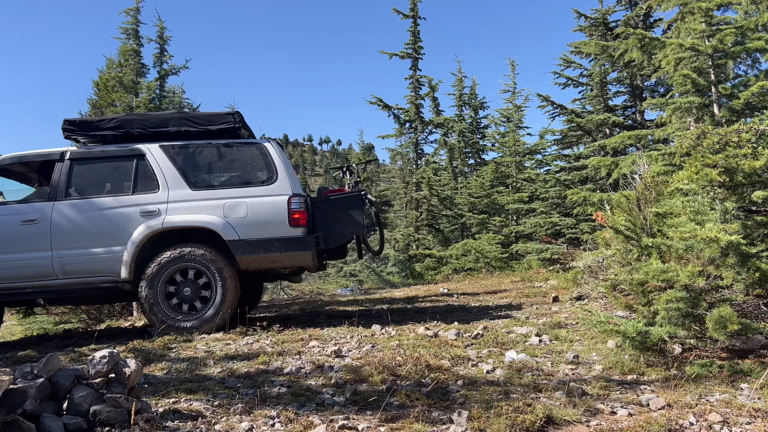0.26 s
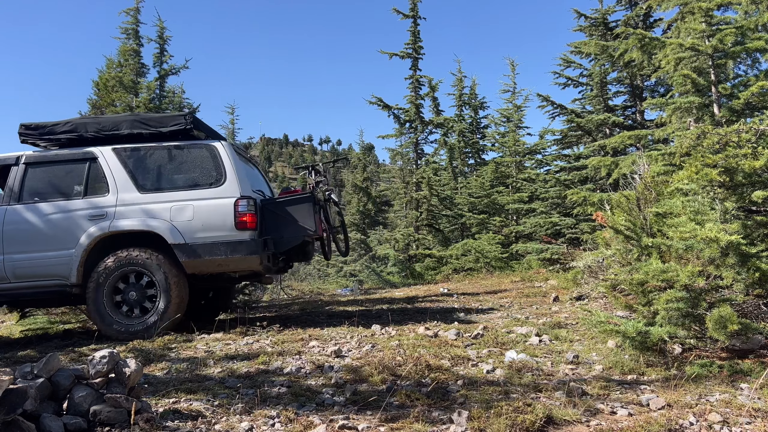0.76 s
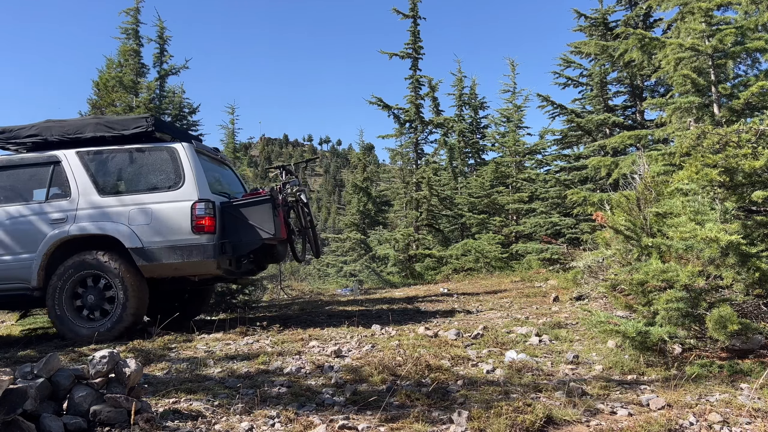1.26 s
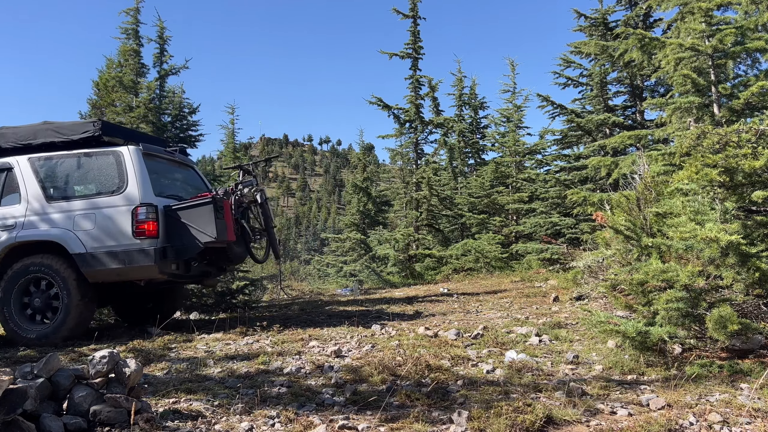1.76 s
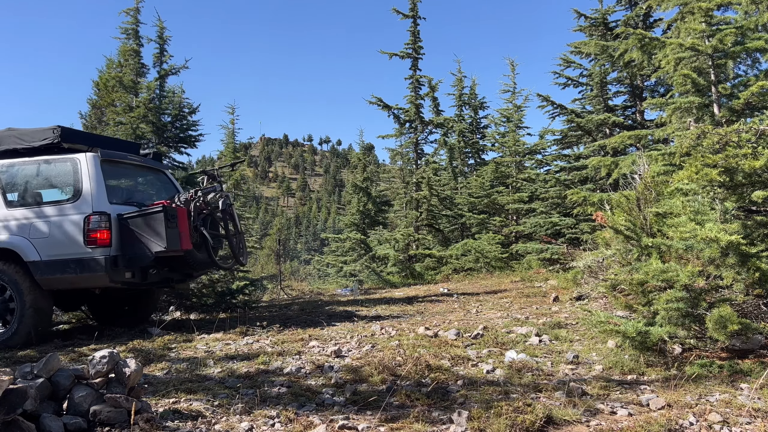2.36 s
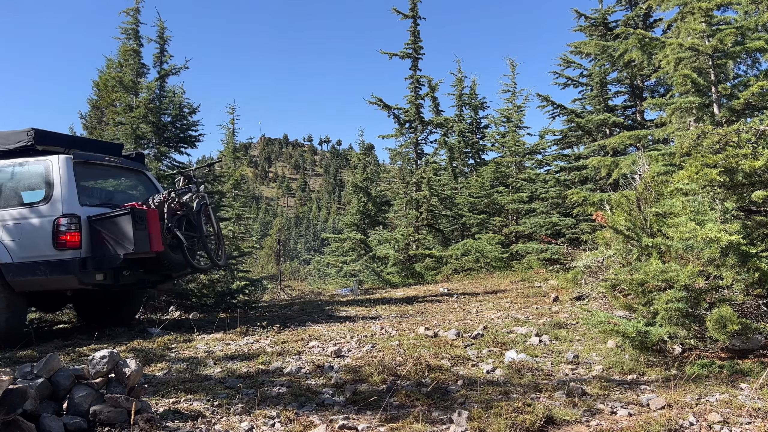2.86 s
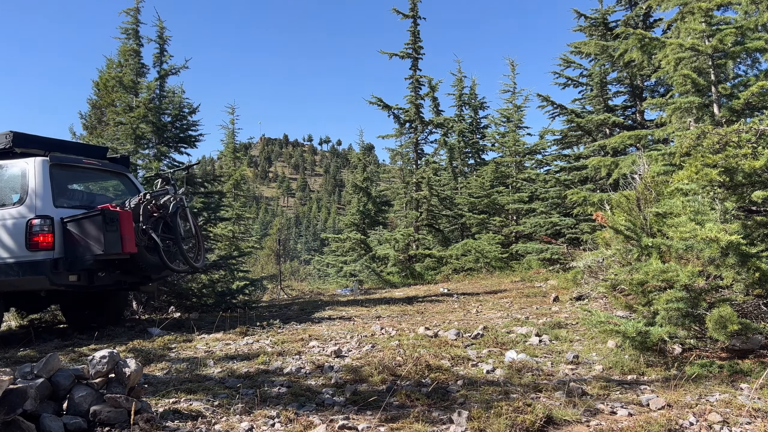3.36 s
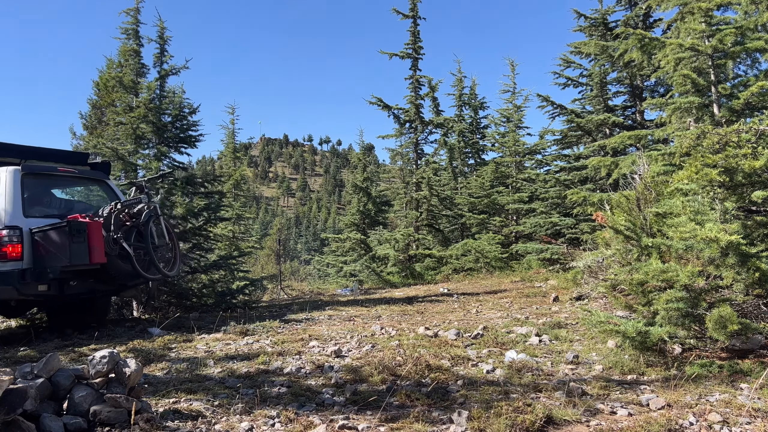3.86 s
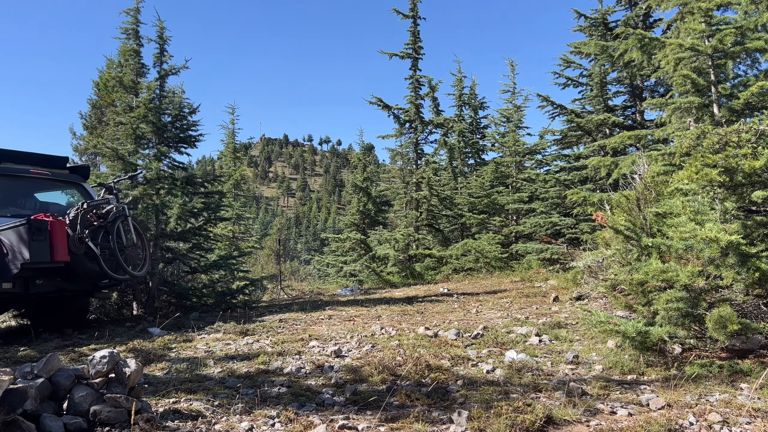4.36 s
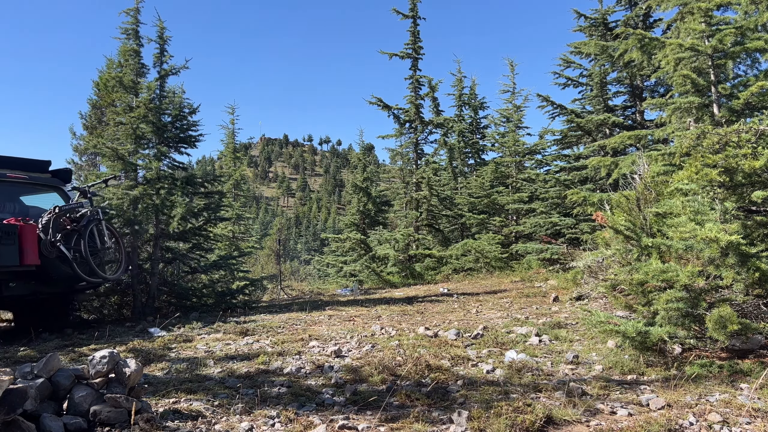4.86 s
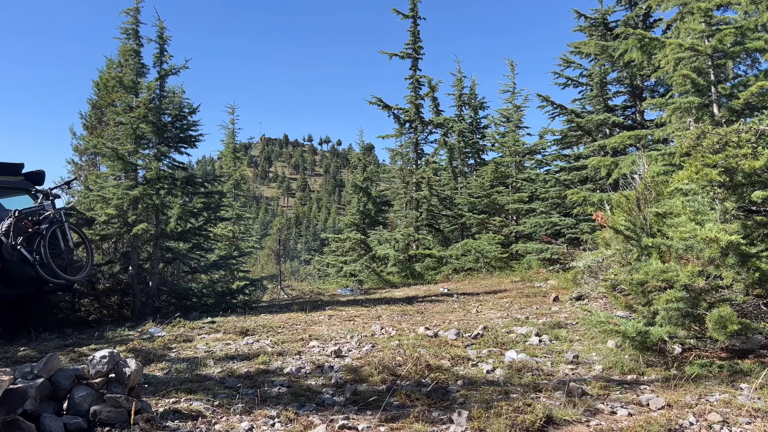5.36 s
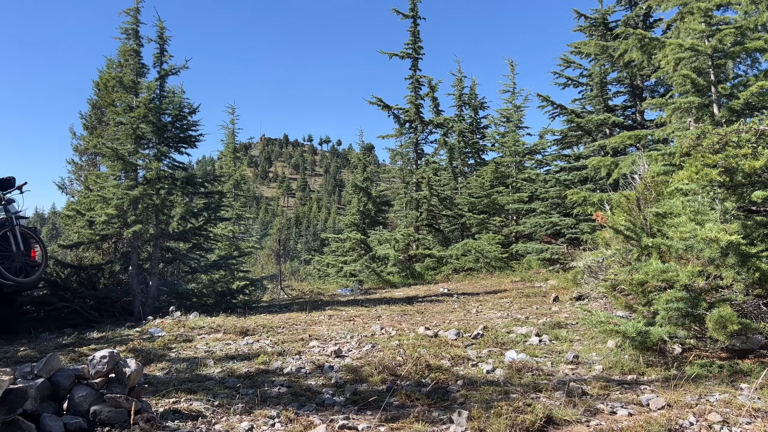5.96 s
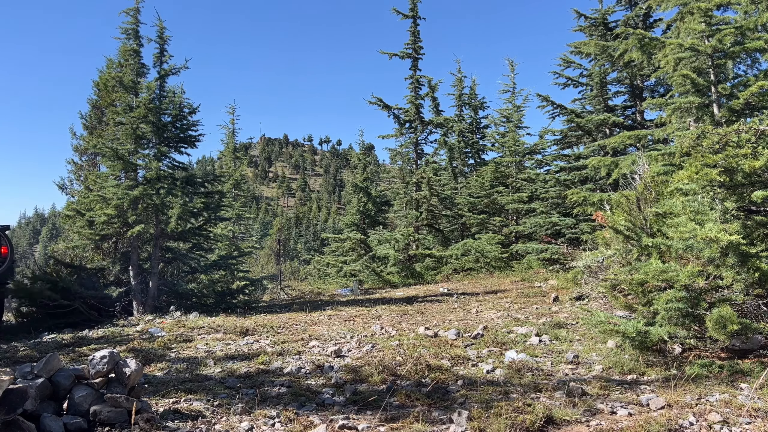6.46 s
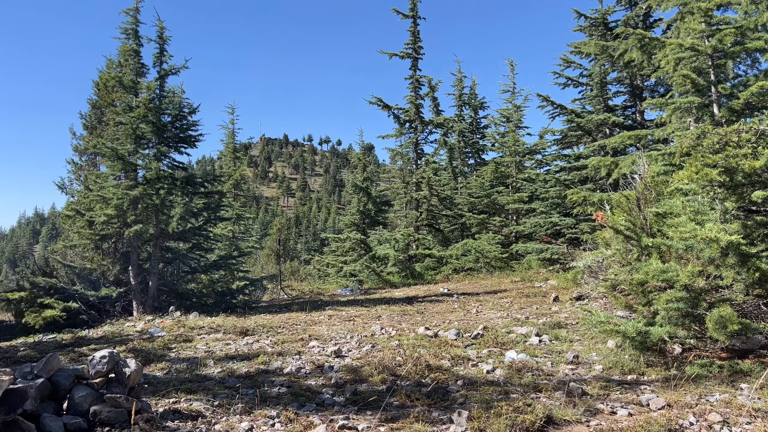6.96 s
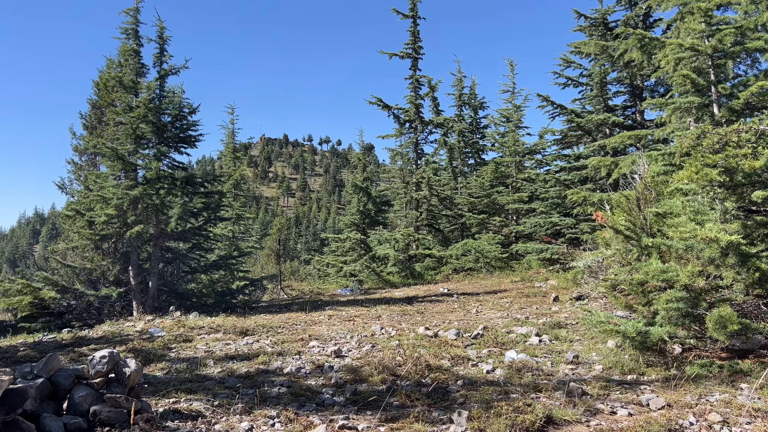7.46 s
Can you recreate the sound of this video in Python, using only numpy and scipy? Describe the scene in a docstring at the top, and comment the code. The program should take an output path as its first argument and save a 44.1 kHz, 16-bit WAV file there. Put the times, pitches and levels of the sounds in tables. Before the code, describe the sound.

Outdoors in a forest clearing, an off-road car creeps away on the left, its low exhaust throbbing steadily just above idle. Tyres grind dully over dirt, with a few stone knocks, the heaviest near the middle. Small birds chirp briskly throughout, nearest on the right, echoing softly among trees. The engine weakens slightly, then drops abruptly at the end. Stationary stereo microphone, wide airy background.

```python
"""From the start an off-road car creeps over a stony forest clearing, its exhaust throbbing just above idle.
Harmonics of the throb make the hum, and shaped noise makes the tyres and the wide forest air.
Small birds chirp throughout, the near ones to the right: swept tones that the trees scatter back.
Stones knock under the tyres as short falling tones, the heaviest almost halfway through.
The hum and tyres weaken as the car draws away, and near the end the exhaust level dips sharply."""
import sys
import numpy as np
from scipy import signal
from scipy.fft import rfft, irfft
from scipy.io import wavfile
from scipy.ndimage import map_coordinates

SR = 44100
rng = np.random.default_rng(int(sys.argv[2]) if len(sys.argv) > 2 else 0)


def unload_wav(signal):
    """Save mono or channel-first audio to the path in sys.argv[1] as 16-bit WAV at rate SR, clipped to [-1, 1]."""
    wavfile.write(
        sys.argv[1],
        SR,
        np.round(np.clip(np.atleast_2d(signal).T, -1, 1) * 32767).astype(np.int16),
    )


N = 339518
TIME = np.arange(N) / SR

# Forest air and distant running noise. Each row: frequency in Hz, relative spectral density in dB.
AIR_SPECTRUM = [(20, -36), (150, 2), (300, -4), (500, -15), (800, -9.5), (1300, -9.5), (1800, -13.5),
                (2400, -18.5), (3500, -18.5), (5000, -21.5), (7000, -26), (10000, -33.5), (15500, -47)]
# Coherence of the air at the two microphones. Each row: frequency in Hz, left-right likeness (0 to 1).
AIR_COHERENCE = [(100, 1), (250, 1), (350, 0.35), (500, 0.18), (800, 0), (1200, 0)]
# level of the air at the start, and its slow fade
AIR_DB, AIR_FADE_DB_PER_S = -46.5, 0.27
# Hisses and snaps in the undergrowth.
# Each row: start in seconds, length in seconds, relative level in dB, centre frequency in Hz.
RUSTLE_EVENTS = [(1.495, 0.014, -46.5, 5950), (4.707, .01, -59, 7000), (6.036, 0.098, -53.5, 7200),
                 (6.124, 0.075, -60, 6960), (7.649, 0.0081, -50, 7870)]
# time for the echoes among the trees to fall by 60 dB
FOREST_T60_S = .85

# Thin whistles from deep in the trees. Each row: start in seconds, length in seconds,
# start pitch in Hz, middle pitch in Hz, end pitch in Hz, relative level in dB.
WHISTLE_EVENTS = [(.0, 0.26, 1755, 1780, 1797, -60), (1.257, 0.69, 2203, 2475, 2384, -62),
                  (1.75, 0.62, 1280, 1187, 1149, -61.5), (2.199, 0.79, 2085, 2012, 2050, -53.5),
                  (4.146, 0.13, 7480, 7560, 7760, -66), (4.554, .5, 1300, 1253, 1204, -61.5),
                  (4.575, .17, 3050, 3334, 3277, -53.5), (7.328, 0.19, 7300, 7450, 7620, -68.5)]
# Faint chirrups of the farther birds. Each row: start in seconds, relative level in dB, top pitch in Hz.
FLOCK_CALLS = [(0, -51, 4100), (.08, -50, 4000), (.64, -50.5, 3750), (0.658, -48.5, 4850),
               (1.18, -55, 3900), (1.243, -51, 4750), (1.63, -55.5, 3800), (2.56, -60, 4770),
               (2.668, -59, 5550), (2.825, -51.5, 4450), (2.9, -50.5, 3900), (2.98, -50.5, 5540),
               (3.315, -50, 4220), (4.05, -52.5, 3800), (4.06, -53, 5500), (4.115, -53, 4800),
               (4.245, -51, 3700), (4.319, -49, 4100), (4.48, -55, 3700), (5.12, -51, 4100),
               (5.58, -53.5, 4150), (6.218, -51.5, 4670), (6.67, -48.5, 3450), (6.745, -51, 3430),
               (6.775, -50, 4700), (6.87, -49, 4080), (7.58, -56, 3500)]
# Contours of the four notes; each call rescales the pitch to its own top and the level by its contrast.
# Each row: time from the start in seconds, relative pitch in Hz, relative level in dB.
ARCH_SHAPE = [(0, 4400, -16), (.005, 5000, -4), (.009, 5600, -1), (.013, 6100, .5), (.018, 5650, -.5),
              (.024, 6000, 0), (.028, 5200, -3), (.033, 4600, -12), (.04, 4500, -22), (.046, 4700, -8),
              (.051, 5000, -5.5), (.056, 4600, -10), (.061, 4500, -24)]
TINK_SHAPE = [(0, 5000, -28), (.008, 5900, -20), (.015, 6250, -11), (.021, 6100, -26), (.025, 5450, -13),
              (.029, 5800, -2), (.035, 6000, 1.5), (.041, 5820, -2), (.047, 5700, -11), (.056, 5650, -22),
              (.072, 5300, -50), (.088, 5100, -20), (.108, 5000, -13), (.12, 4900, -30)]
CHIRRUP_SHAPE = [(0, 3650, -18), (.004, 4000, -5), (.008, 4250, -1.5), (.013, 3830, -7), (.018, 4070, 4),
                 (.022, 3700, -8), (.027, 3300, -11), (.031, 3000, -18), (.036, 3120, -10),
                 (.042, 2750, -16), (.048, 2450, -25)]
CHUP_SHAPE = [(0, 3500, -16), (.005, 3900, -6), (.009, 4400, -6), (.014, 3500, -3), (.02, 3750, 2),
              (.025, 3350, 1), (.03, 2950, -4), (.037, 3020, -6), (.044, 2550, -10), (.055, 2350, -15)]
# High arched calls. Each row: start in seconds, relative level in dB.
ARCH_CALLS = [(0.172, -40), (0.856, -47), (0.972, -51.5), (2.162, -41), (3.526, -42.5), (4.867, -45.5),
              (5.747, -47), (6.882, -44)]
# Falling chirrups. Each row: start in seconds, relative level in dB, top pitch in Hz.
CHIRRUP_CALLS = [(.34, -42, 4305), (.912, -47.5, 4360), (.984, -42.5, 4240), (1.715, -42.5, 4250),
                 (1.929, -46, 5090), (2.508, -41.5, 4150), (3.05, -43.5, 4360), (3.726, -40.5, 4417),
                 (4.386, -40.5, 4305), (5.003, -40.5, 4270), (5.81, -40.5, 4330), (6.421, -43.5, 4220),
                 (6.823, -45.5, 4290), (7.423, -38, 4220)]
# Two-note calls, a low chup and then a high tink.
# Each row: start in seconds, relative chup level in dB, relative tink level in dB.
CHUP_TINK_CALLS = [(.724, -49.5, -44.5), (2.108, -41.5, -40), (3.612, -43, -43.5), (5.198, -40.5, -38),
                   (6.317, -43, -38.5)]
CHUP_HZ, TINK_HZ, TINK_AFTER_S = 4400, 6250, .068
# top pitch of the arched calls, and of the faint second tone above the low chirps
ARCH_HZ, UPPER_HZ = 6070, 5840
# pitch tremors per second in a bird's voice, and decay time constant of the reflections around its perch
RASP_RATE, TWIGS_S = 1100, .005

# Stones under the tyres. Each row: start in seconds, relative peak level in dB, settled pitch in Hz.
STONE_KNOCKS = [(.416, -33, 560), (.795, -36, 570), (3.752, -24.5, 318), (4.155, -32, 574),
                (5.891, -40, 635)]
# Tyres on dirt. Each row: frequency in Hz, relative spectral density in dB.
TYRE_SPECTRUM = [(100, -21), (280, -10), (390, 0.5), (500, -2.5), (700, -7.5), (1200, -20.5), (4000, -63)]
# Fade of the tyres as the car draws away. Each row: time in seconds, relative level in dB.
TYRE_LEVEL = [(0, -50), (.5, -52), (2, -53.5), (7.7, -55)]

# Response of the exhaust pipe, one row for each multiple of the throb rate from the 1st up.
# Each row: relative level in dB, lift under load in dB per throb/s of sag.
PIPE_RESPONSE = [(-36.5, -6), (-10.5, -2.5), (-9.5, -6.5), (2.42, 0.9), (-2.5, 3), (-8.5, 1.5), (-19, -1.5),
                 (-16.5, 1), (-16, 5.5), (-23, 2.5), (-23, 4.5), (-42.5, 2), (-32.5, 6.5), (-46.5, 2),
                 (-40, 1), (-52, 1.5)]
# Uneven burning in the exhaust. Each row: frequency in Hz, relative spectral density in dB.
RUMBLE_SPECTRUM = [(20, -42), (32, -43), (60, -14.5), (90, -16.5), (130, -9), (220, -2), (300, -19.5),
                   (500, -33), (900, -60.5)]
# Engine speed, sagging as the car climbs. Each row: time in seconds, throbs per second.
ENGINE_SPEED = [(0, 22.66), (.7, 22.51), (1.3, 21.41), (2.2, 21.52), (2.7, 21.61), (4.6, 21.6),
                (4.95, 21.09), (5.2, 22.58), (5.5, 22.18), (5.9, 22.47), (6.8, 22.21), (7.45, 21.53)]
# Exhaust level, lower as the car moves off. Each row: time in seconds, relative level in dB.
EXHAUST_FADE = [(0, -24), (2.4, -24.5), (3.8, -25), (5.2, -24.5), (6.0, -25.5), (7.45, -27.5)]
# Deep dip of the exhaust; its first value also holds for all the time before.
# Each row: time in seconds, relative level in dB.
EXHAUST_DIP = [(7.47, -4), (7.525, -12), (7.54, -33), (7.6, -39), (7.64, -15), (7.68, -10), (7.7, -24)]
# share of a throb already gone at the start, and random timing wobble of the throbs in radians
START_TURN, SWAY = .178, .014
# throbs per second at middling load; the sag below it measures the load
CRUISE_RATE = 22
# sag at which the note stops brightening (throbs per second)
FULL_LOAD_SAG = 0.44
# reflections around the car favour one band of the hum, which slides down as it drives off
FAVOURED_HZ, FAVOURED_FALL_OCT_PER_S, FAVOURED_WIDTH_OCT, FAVOURED_DB = 287, .14, 0.15, 3.6
# upper edge of the recorder's band
EDGE_HZ = 15750


def gain_of(db):
    """An amplitude ratio is ten to the power of its decibels over twenty."""
    return 10 ** (np.asarray(db) / 20)


def evened(x):
    """Dividing by the root mean square gives a signal unit power."""
    return x / np.sqrt(np.mean(x ** 2) + 1e-20)


def read(points, hz):
    """A spectrum is interpolated along a logarithmic frequency axis."""
    f, value = np.transpose(points)
    return np.interp(np.log(hz + 1), np.log(f + 1), value)


def curves(rows, t):
    """Each column of a table is interpolated linearly at the times t, its end values held."""
    s, *columns = np.transpose(rows)
    return [np.interp(t, s, c) for c in columns]


def add(mix, s, sound):
    """By superposition a sound is summed into the mix from s seconds on."""
    part = mix[max(round(s * SR), 0):][:len(sound)]
    part += sound[:len(part)]


def wander(size, rate):
    """A smooth random fluctuation of about unit size joins rate random values per second."""
    t = np.arange(size) / SR * rate
    return map_coordinates(rng.standard_normal(int(t[-1]) + 3), [t], order=2, mode="nearest")


def noise(spectrum):
    """White noise weighted in the frequency domain becomes coloured noise of unit power."""
    weight = gain_of(read(spectrum, np.fft.rfftfreq(N, 1 / SR)))
    return evened(irfft(rfft(rng.standard_normal(N)) * weight, N))


def delayed(x, count):
    """A longer path retards the sound, here by count samples."""
    return np.r_[np.zeros(count), x[:-count]]


def air(swell_db=1.0, left_db=1.5):
    """Diffuse noise is coherent between spaced microphones only in the bass; its body leans left."""
    hz = np.fft.rfftfreq(N, 1 / SR)
    same = np.clip(read(AIR_COHERENCE, hz), -1, 1)
    left, other = rfft(noise(AIR_SPECTRUM)), rfft(noise(AIR_SPECTRUM))
    right = same * left + np.sqrt(1 - same ** 2) * other
    # left-right level difference in dB, shared equally between the sides
    difference_db = read([(200, left_db / 2), (500, left_db), (2000, 1.0), (10000, -1.0)], hz)
    lean = gain_of(difference_db / 2)
    wash = irfft(np.array([left * lean, right / lean]), N)
    return wash * gain_of(AIR_DB - AIR_FADE_DB_PER_S * TIME + swell_db * wander(N, 14))


def rustles(octaves=0.43):
    """A brief burst of noise, Gaussian in log frequency, is heard as a bright hiss or snap."""
    out = np.zeros(N)
    for s, length, db, hz in RUSTLE_EVENTS:
        size = int(length * SR)
        distance_oct = np.log2((np.fft.rfftfreq(size, 1 / SR) + 1) / hz)
        colour = np.exp(-(distance_oct / octaves) ** 2 / 2)
        burst = evened(irfft(rfft(rng.standard_normal(size)) * colour, size))
        add(out, s, gain_of(db) * burst * np.hanning(size))
    return out


def forest(x, t60, build, clump_db=3.2):
    """Scattering by trunks builds up clumps of echoes that decay exponentially, different at each side."""
    t = np.arange(SR) / SR
    decay = gain_of(-60 * t / t60) * (1 - np.exp(-(t / build) ** 2)) * gain_of(clump_db * wander(SR, 62.4))
    taps = rng.standard_normal((2, SR)) * (rng.random((2, SR)) < .1) * decay
    taps = taps / np.linalg.norm(taps, axis=1, keepdims=True)
    return signal.fftconvolve(x[None], taps, axes=1)[:, :N]


def from_right(x, count, near_db=-14):
    """Sound from the right reaches the left microphone later; ground and near branches reflect it quickly."""
    t = np.arange(600) / SR
    taps = rng.standard_normal((2, len(t))) * (rng.random((2, len(t))) < .05) * np.exp(-t / 0.023)
    taps = taps / np.linalg.norm(taps, axis=1, keepdims=True)
    near = signal.oaconvolve(x[None], taps, axes=1)[:, :N]
    return np.array([delayed(x, count), x]) + gain_of(near_db) * near


def whistles(waver=.016, flutter_db=3.5):
    """A distant whistle is a tone of parabolic pitch and unsteady level that swells and fades."""
    out = np.zeros(N)
    for s, length, from_hz, mid_hz, to_hz, db in WHISTLE_EVENTS:
        size = int(length * SR)
        parabola = np.polyfit([0, .5, 1], [from_hz, mid_hz, to_hz], 2)
        bend = np.polyval(parabola, np.linspace(0, 1, size))
        hz = bend * (1 + waver * wander(size, 260))
        level = gain_of(db + flutter_db * wander(size, 55)) * signal.windows.tukey(size, .55)
        add(out, s, level * np.sin(2 * np.pi * np.cumsum(hz) / SR))
    return out


def notes(shape, rows, waver, contrast, ragged_db, scatter):
    """Frequency modulation makes a call raspy, and reflections from twigs around the perch blur it."""
    out, t = np.zeros(N), np.arange(0, shape[-1][0], 1 / SR)
    hz, db = curves(shape, t)
    for s, level_db, top_hz in rows:
        pitch_hz = top_hz * hz / hz.max() * (1 + waver * wander(len(t), RASP_RATE))
        turns = np.cumsum(pitch_hz) / SR
        # contrast scales the accents of the note shape
        level = gain_of(level_db + contrast * db + ragged_db * wander(len(t), 389))
        note = level * np.sin(2 * np.pi * turns) * signal.windows.tukey(len(t), .12)
        twigs = rng.standard_normal(len(t)) * (rng.random(len(t)) < .1) * np.exp(-t / TWIGS_S)
        add(out, s, note)
        add(out, s, scatter * signal.fftconvolve(note, twigs / np.linalg.norm(twigs)))
    return out / np.hypot(1, scatter)


def birds(high_waver, low_waver, contrast, ragged_db, scatter, upper_db=-17):
    """Three voices differ in modulation: high arches, cleaner tinks, rougher low chirps with an upper tone."""
    arch_rows = [(s, db, ARCH_HZ) for s, db in ARCH_CALLS]
    chup_rows = [(s, db, CHUP_HZ) for s, db, _ in CHUP_TINK_CALLS]
    tink_rows = [(s + TINK_AFTER_S, db, TINK_HZ) for s, _, db in CHUP_TINK_CALLS]
    upper_rows = [(s, db + upper_db, UPPER_HZ) for s, db, _ in CHIRRUP_CALLS + chup_rows]
    low_parts = [(CHIRRUP_SHAPE, CHIRRUP_CALLS), (CHUP_SHAPE, chup_rows), (CHIRRUP_SHAPE, upper_rows)]
    low = sum(notes(shape, rows, low_waver, contrast, ragged_db, scatter) for shape, rows in low_parts)
    arches = notes(ARCH_SHAPE, arch_rows, high_waver, contrast, ragged_db, scatter)
    tinks = notes(TINK_SHAPE, tink_rows, high_waver / 2, contrast, ragged_db / 2, scatter / 2)
    return arches, tinks, low


def knocks(rise=0.0023, sag=0.91, sag_time=0.0013):
    """A shifting stone gives a strongly damped tone of a few cycles that falls in pitch (times in s)."""
    out, t = np.zeros(N), np.arange(2000) / SR
    for s, db, hz in STONE_KNOCKS:
        turns = np.cumsum(hz * (1 + sag * np.exp(-t / sag_time))) / SR
        envelope = (t / rise * np.exp(1 - t / rise)) ** 2
        add(out, s, gain_of(db) * envelope * np.sin(2 * np.pi * turns))
    return out


def tyres(level_db=2.5, lumpy_db=2.0):
    """Tyres grinding over dirt radiate dull, lumpy noise, partly coherent between the microphones."""
    level = gain_of(level_db + curves(TYRE_LEVEL, TIME)[0] + lumpy_db * wander(N, 45))
    shared = noise(TYRE_SPECTRUM)
    sides = np.array([evened(shared + 1.64 * noise(TYRE_SPECTRUM)) for side in range(2)])
    return level * sides * gain_of([[1.4], [-1.4]])


def pipe_lags(pipe_db, orders):
    """A causal resonator has minimum phase, so its lags follow from the Hilbert transform of its log gain."""
    log_gain = np.log(gain_of(np.r_[pipe_db[0], pipe_db, np.full(16, -45.)]))
    lag = signal.hilbert(np.r_[log_gain, log_gain[-2:0:-1]]).imag[1:len(orders) + 1]
    # the silencer chamber holds back the orders near its resonance, at the 3rd, which rounds each throb
    return lag + np.pi + 2 * np.arctan((orders - 3) / .75)


def exhaust(level_db=3.5, flutter=0.049, rumble_db=-24, limp=0.061, stagger=0.0081, puff=0.5):
    """Three unequal cylinders of a bank ring the pipe in turn; load drags the speed and brightens the note."""
    rate = curves(ENGINE_SPEED, TIME)[0]
    sag = np.minimum(CRUISE_RATE - rate, FULL_LOAD_SAG)
    turns = START_TURN + np.cumsum(rate) / SR
    pipe_db, load_db = np.transpose(PIPE_RESPONSE)
    orders = np.arange(len(PIPE_RESPONSE)) + 1
    # strength (limp) and timing (stagger, in throbs) repeat once in every three throbs
    cycle = 2 * np.pi * turns / 3
    turns = turns + stagger * np.sin(cycle) + SWAY / 2 / np.pi * wander(N, 22)
    favoured_hz = FAVOURED_HZ * 2 ** (-FAVOURED_FALL_OCT_PER_S * TIME)
    hum = np.zeros(N)
    for k, db, lift_db, lag in zip(orders, pipe_db, load_db, pipe_lags(pipe_db, orders)):
        distance_oct = np.log2(k * rate / favoured_hz)
        favour_db = FAVOURED_DB * np.exp(-(distance_oct / FAVOURED_WIDTH_OCT) ** 2 / 2)
        hum += gain_of(db + lift_db * sag + favour_db) * np.cos(2 * np.pi * k * turns - lag)
    hum *= gain_of(level_db) * (1 + limp * np.sin(cycle) + flutter * wander(N, 28))
    # each throb pushes out a puff of rough gas
    rumble = gain_of(rumble_db) * noise(RUMBLE_SPECTRUM) * (1 + puff * np.sin(2 * np.pi * turns))
    course_db = curves(EXHAUST_FADE, TIME)[0] + curves(EXHAUST_DIP, TIME)[0]
    return gain_of(course_db) * (hum + rumble)


def scene():
    """Direct sound, scattered echoes and background superpose at two spaced microphones."""
    arches, tinks, low = birds(high_waver=0.022, low_waver=0.033, contrast=0.95, ragged_db=2.0, scatter=.6)
    direct = from_right(gain_of(3.0) * arches, count=110)
    direct += from_right(gain_of(4.5) * tinks + gain_of(3.0) * low, count=94, near_db=-7)

    # echoes come by many paths, so they carry the whole of each sweep more evenly
    arches, tinks, low = birds(high_waver=.04, low_waver=.085, contrast=.65, ragged_db=1.5, scatter=.15)
    flock = notes(CHIRRUP_SHAPE, FLOCK_CALLS, waver=.045, contrast=0.7, ragged_db=3.5, scatter=0.71)
    thin = whistles()
    echoes = forest(gain_of(2.5) * arches + gain_of(-3.0) * tinks, FOREST_T60_S, build=0.02)
    low_and_far = gain_of(0.9) * low + flock + gain_of(-1.0) * thin
    echoes += forest(low_and_far, FOREST_T60_S, build=0.022)
    far = from_right(gain_of(-0.5) * flock, count=60) + gain_of(-2.0) * thin

    hum = exhaust()
    # the car is on the left, so that microphone hears it a little sooner and louder
    car = np.array([hum, delayed(hum, count=11)]) * gain_of([[.25], [-.25]])
    car += knocks() * gain_of([[1.2], [-1.2]])
    return direct + far + echoes + car + tyres() + air() + np.array([rustles(), rustles()])


def record(dry):
    """A linear-phase low-pass filter sets the recorder's band limit."""
    band = signal.firwin(511, EDGE_HZ, window=("kaiser", 9), fs=SR)
    return signal.oaconvolve(dry, band[None], "same")


dry = scene()
out = record(dry)
unload_wav(out)
```